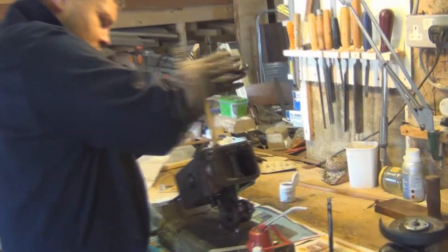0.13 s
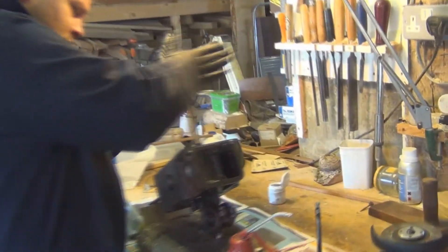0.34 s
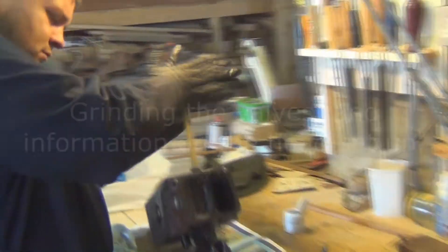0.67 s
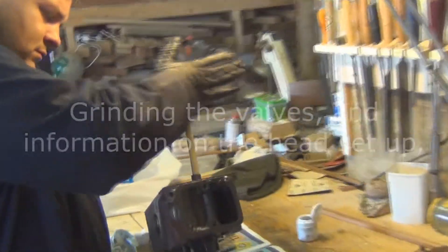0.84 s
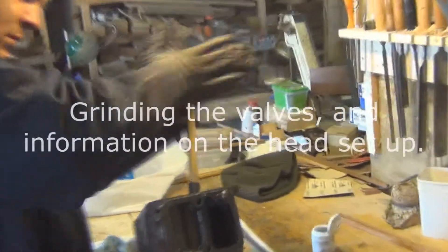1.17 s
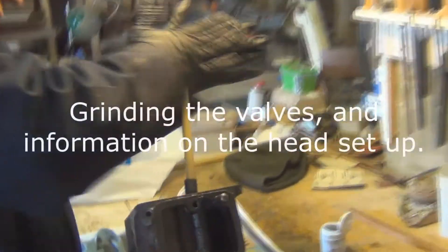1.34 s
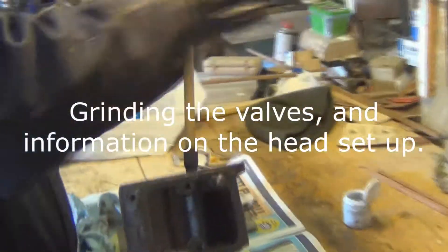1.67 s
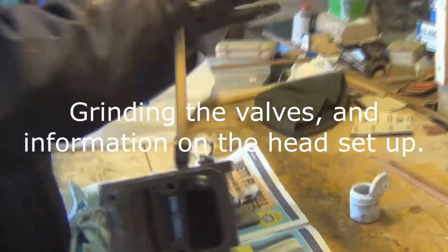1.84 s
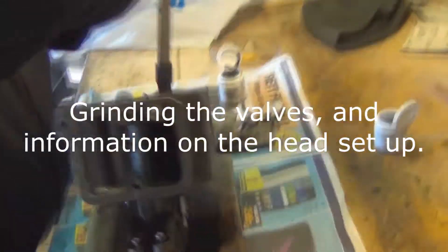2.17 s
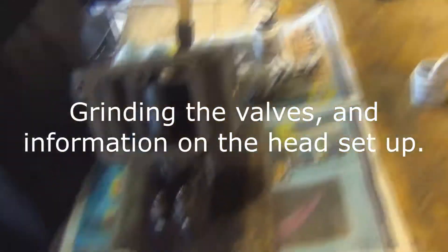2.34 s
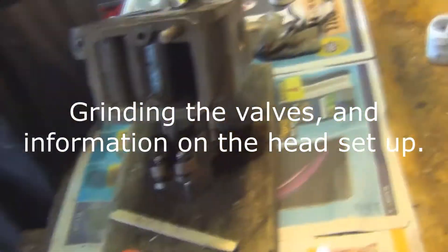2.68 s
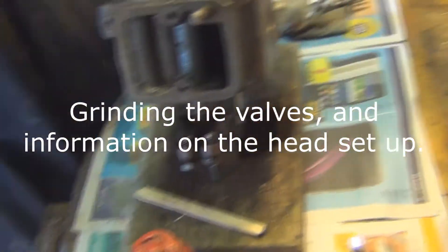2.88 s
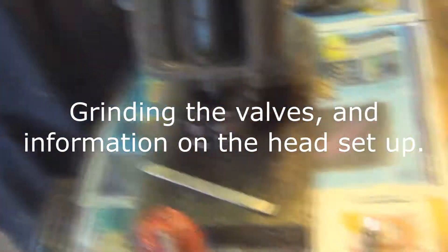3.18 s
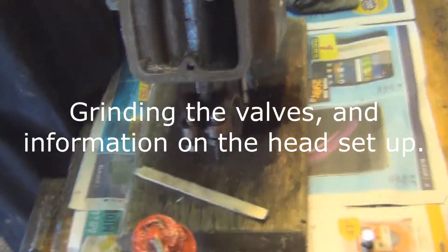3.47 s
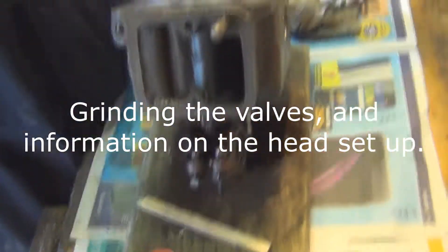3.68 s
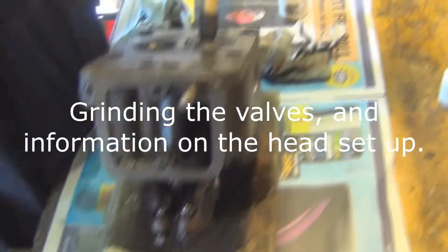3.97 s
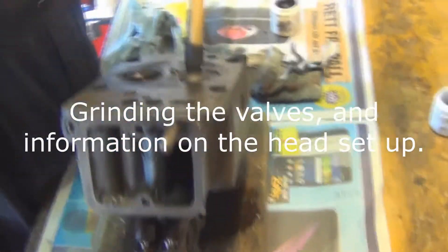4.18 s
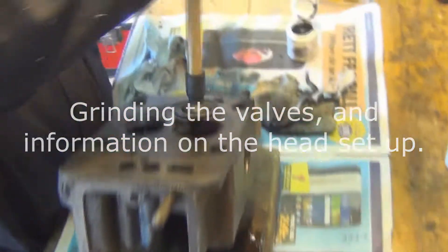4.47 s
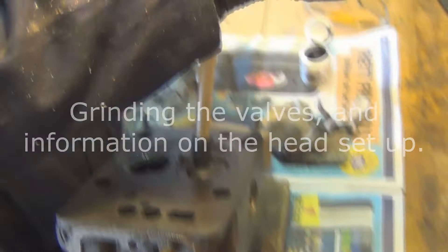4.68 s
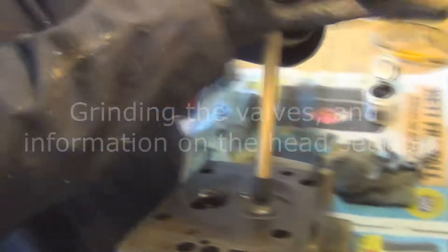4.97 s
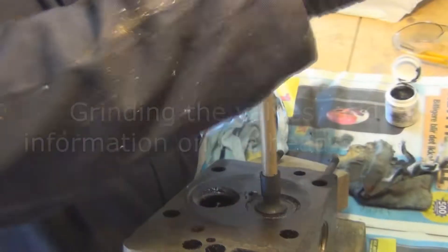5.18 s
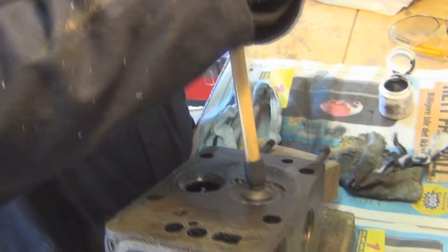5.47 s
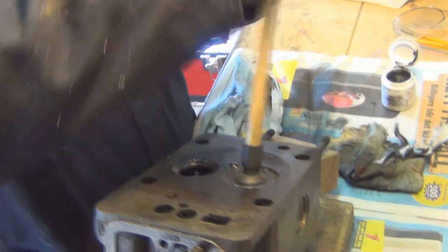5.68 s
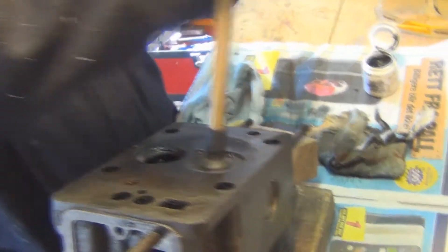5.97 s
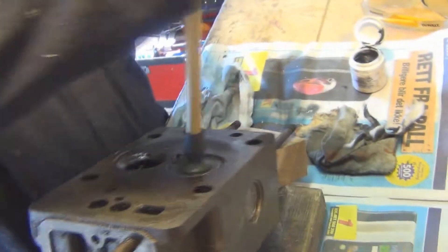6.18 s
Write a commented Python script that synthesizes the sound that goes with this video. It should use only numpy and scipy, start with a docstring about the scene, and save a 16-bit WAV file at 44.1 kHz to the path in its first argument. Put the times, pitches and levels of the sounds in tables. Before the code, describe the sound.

Rapid dry rasps, hissy and slightly singing, alternate as a stick rolled between gloved palms twists a valve on its seat. Small hollow pops and crackling grit join in, growing firmer, with a short rough iron shudder midway. A pause brings a bright steel clink, a hard scrape and a hollow knock, then weak rubs and a final flurry. Close microphone, short room reflections, low rumble and faint hum.

```python
"""A valve is lapped by hand in a small workshop, over still air, dull handling rumble, a faint hum and a thin whine.
From the start a wooden stick rolled between gloved palms rasps to and fro, eight or nine strokes a second: grit noise.
Soon the valve drops on its seat again and again, ringing the air in the port (decaying sines), and grains snap (noise puffs).
Nearly halfway, the iron head judders once on the bench: uneven jerks through its resonances. Later, in a pause, the valve
knocks down with a steel clink, bounces, grinds hard and knocks once more; a few last strokes follow."""
import sys
import numpy as np
from scipy import signal
from scipy.fft import rfft, irfft
from scipy.io import wavfile

SR = 44100
rng = np.random.default_rng(int(sys.argv[2]) if len(sys.argv) > 2 else 0)


def persist_wave(psi):
    """Save psi, clipped to +-1, as 16-bit WAV."""
    counts = np.round(np.clip(psi, -1, 1) * 32767).astype(np.int16)
    wavfile.write(sys.argv[1], SR, np.atleast_2d(counts).T)


N = 279153
TIME = np.arange(N) / SR
FIRM_DB = -38  # reference level of an ordinary firm stroke, ahead of the tone shaping


def gain_of(db):
    """Decibels to a factor."""
    return 10 ** (np.asarray(db) / 20)


def unit_rms(x):
    """Scales to rms 1."""
    return x / np.sqrt(np.mean(x ** 2) + 1e-20)


def read(points, hz):
    """Reads a table of (f/Hz, value) on a log-frequency axis."""
    f, value = np.transpose(points)
    return np.interp(np.log(hz + 1), np.log(f + 1), value)


def level(curve):
    """A table of (t/s, level/dB) as a gain for every sample."""
    return gain_of(np.interp(TIME, *np.transpose(curve)))


def add(mix, s, sound):
    """Lays a sound into the mix at s seconds."""
    part = mix[round(s * SR):][:len(sound)]
    part += sound[:len(part)]


def cut(x, hz, kind, order=2):
    """Butterworth low-pass or high-pass."""
    return signal.sosfilt(signal.butter(order, hz, kind, fs=SR, output="sos"), x)


def colour(x, points, size=4096):
    """Minimum-phase filter with the given spectrum that keeps the power of white noise."""
    log_gain = np.log(gain_of(read(points, abs(np.fft.fftfreq(size, 1 / SR)))))
    taps = np.fft.ifft(np.exp(np.conj(signal.hilbert(log_gain)))).real
    taps = taps[:size // 2]
    return signal.oaconvolve(x, taps / np.linalg.norm(taps))[:len(x)]


def resonate(x, hz, width):
    """One resonance, width in Hz, with a gain of about 1 at its peak."""
    r = np.exp(-np.pi * width / SR)
    return 2 * signal.lfilter([1 - r], [1, -r * np.exp(2j * np.pi * hz / SR)], x).real


def wander(seconds):
    """Smooth random drift of rms 1 that changes within the given time."""
    window = np.hanning(max(3, int(2 * seconds * SR)))
    return unit_rms(signal.oaconvolve(rng.standard_normal(N), window, "same"))


def grit(per_s, spread_db, smooth):
    """Tiny fractures of uneven size over a smooth hiss."""
    size = gain_of(spread_db * np.minimum(rng.exponential(1, N), 4))
    size = size * rng.choice([-1, 1], N)
    fractures = unit_rms(size * (rng.random(N) < per_s / SR))
    return unit_rms(fractures + smooth * rng.standard_normal(N))


def swipe(start, stop, db, rise, fall, sag_db_per_s=0):
    """A slide swells, sags slowly and dies away; db is its level halfway, before the soft ends."""
    past_middle = np.clip(TIME, start, stop) - (start + stop) / 2
    swell = 1 + np.tanh((TIME - start) / rise)
    decline = 1 - np.tanh((TIME - stop) / fall)
    return gain_of(db - sag_db_per_s * past_middle) * swell * decline / 4


def ring(modes, hold_s=0):
    """Sines from (f/Hz, level/dB, t60/s), dying away after a blow or after a push that lasts hold_s."""
    t = TIME[:SR // 2]
    fading = np.maximum(t - hold_s, 0)
    return sum(gain_of(db - 60 * fading / t60) * np.sin(2 * np.pi * hz * t) for hz, db, t60 in modes)


def burst(t60):
    """A short puff of noise with a sharp front."""
    t = TIME[:SR // 4]
    return rng.standard_normal(len(t)) * gain_of(-60 * t / t60)


def workshop(x):
    """A few near reflections and a short tail, each band dying at its own speed."""
    # tail by band: f/Hz, t60/s
    tail_times = [(100, 0.35), (700, 0.27), (2000, 0.26), (8000, 0.083), (16000, 0.2)]
    # reflections from the bench: delay/s, level/dB
    bench_echoes = [(.0054, -24.5), (.0081, -22.5), (.0122, -36)]
    # reflections from the walls: delay/s, level/dB
    wall_echoes = [(.056, -39), (.0655, -29)]
    sparse = rng.random(SR // 2) < 3000 / SR
    taps = rng.choice([-1., 1.], SR // 2) * sparse * (TIME[:SR // 2] > .012)
    hz, t, z = signal.stft(taps, SR, nperseg=256)
    decay = gain_of(-60 * t / read(tail_times, hz)[:, None])
    tail = signal.istft(z * decay, SR, nperseg=256)[1]
    near, far = np.zeros((2, len(tail)))
    for s, db in bench_echoes:
        add(near, s, gain_of([db]))
    for s, db in wall_echoes:
        add(far, s, gain_of([db]))
    # clutter scatters the treble, so only the lows come back as clean echoes
    early = cut(near, 3000, "low", order=1) + cut(far, 630, "low", order=6)
    reverb = early + gain_of(-14.5) * tail / np.linalg.norm(tail)
    return x + signal.fftconvolve(x, reverb)[:N]


def background(shake):
    """Dull handling rumble and still air are coloured noise; a faint electrical hum and a thin whine are sines."""
    # dull handling rumble: f/Hz, relative density/dB per Hz
    rumble_colour = [(30, -20), (70, -11), (96, -0.5), (130, -7.5), (215, -4.5), (300, -6.5), (450, -8.5),
                     (650, -15.5), (1500, -8), (5000, -104)]
    # still room: f/Hz, relative density/dB per Hz
    air_colour = [(30, -2), (90, 10), (200, -6), (400, -1.5), (750, 9.5), (1200, 2.5), (3000, -8.5),
                  (7000, -3), (10000, -15.5), (16000, -12.5)]
    hum_hz, hum_rms_db = 294.2, -73.5
    whine_hz, whine_rms_db = 15625, -89
    lumps = gain_of(3.5 * wander(seconds=.02))
    rumble = gain_of(-3.5) * shake * colour(rng.standard_normal(N) * lumps, rumble_colour)
    air = gain_of(-63.5) * colour(rng.standard_normal(N), air_colour)
    hum = gain_of(hum_rms_db) * np.sin(2 * np.pi * hum_hz * TIME)
    whine = gain_of(whine_rms_db) * np.sin(2 * np.pi * whine_hz * TIME)
    return rumble + air + np.sqrt(2) * (hum + whine)


def shaking(scraping):
    """Strength of the rumble: slow handling, and the bench shaken a moment after hard grinding."""
    # handling, ahead of the rumble's own trims: t/s, level/dB
    handling = [(0, -66), (1.2, -63), (1.8, -59.5), (2.3, -61), (2.9, -57.5), (3.4, -63.5), (3.9, -74),
                (4.3, -65), (4.85, -59), (5.25, -71), (6.3, -78)]
    lag_s, grind_db = 0.019, -14.5  # level against the scrape
    late_scrape = np.interp(TIME - lag_s, TIME, scraping)
    return np.hypot(level(handling), gain_of(grind_db) * late_scrape)


def boom(scraping):
    """The bench top swells under a hard grind and rings on: a sine drives a resonance of the same pitch."""
    hz, width_hz, against_scrape_db = 96.4, 9, -22
    tone = np.sqrt(2) * np.sin(2 * np.pi * hz * TIME)
    return resonate(gain_of(against_scrape_db) * scraping * tone, hz, width_hz)


def judder():
    """The iron head slips in quick uneven jerks; its low resonances die last."""
    # resonances of the iron head: f/Hz, width/Hz, relative level/dB
    head_modes = [(148, 49, -9.5), (222, 47, -6), (296, 32, 7), (364, 110, -6.5), (622.4, 28, 5.5),
                  (790, 140, -13), (1038, 8.3, 10.5), (1130, 31, -7), (1147, 100, -1), (1567, 47, 4),
                  (1930, 200, -8), (2590, 120, -3)]
    slips = grit(per_s=390, spread_db=4.0, smooth=0.73)
    body = sum(gain_of(db) * resonate(slips, hz, width) for hz, width, db in head_modes)
    body = unit_rms(cut(cut(body, 90, "high"), 2370, "low"))
    low = cut(body, 400, "low")
    settled = np.clip((TIME - 2.56) / 0.085, 0, 1)  # the jerks soften as the head comes to rest
    slipping = swipe(start=2.441, stop=2.685, db=-37, rise=0.0022, fall=.018)
    return slipping * (body * (1 - 0.83 * settled) + 0.73 * settled * low)


def crack(hz, t60):
    """One grain breaking: a short broad crack around hz, with little above 9.7 kHz."""
    shape = [(hz / 8, -20), (hz / 2, -5), (hz, 0), (hz * 1.15, -4), (hz * 3, -24), (hz * 9, -45)]
    return cut(colour(burst(t60), shape), 9700, "low")


def snaps(speed):
    """A few large grains snap loudly; smaller ones break at random, as hard as the valve slides."""
    # the largest grains: t/s, level/dB ahead of the top cut, centre f/Hz, t60/s
    large_grains = [(.58, -24.5, 7200, .013), (.581, -37, 2020, .05), (.6413, -45, 930, .04),
                    (1.191, -27.5, 3570, 0.018), (1.32, -37, 7300, 0.016), (1.446, -29, 4440, 0.014),
                    (1.563, -25.5, 4330, 0.021), (1.583, -27.5, 4970, 0.017), (1.7413, -37.5, 2340, 0.062),
                    (1.793, -30, 6000, 0.012), (1.8397, -25, 4960, 0.011), (1.8734, -33.5, 2170, 0.041),
                    (1.878, -37.5, 440, .02), (2.099, -29.5, 4300, 0.022), (2.2388, -30.5, 1670, 0.011),
                    (2.741, -37.5, 1400, 0.025), (2.814, -38, 6500, 0.027), (2.937, -34.5, 2330, 0.011),
                    (2.959, -29, 6000, .015), (3.105, -37, 1500, .028), (3.183, -43, 5570, 0.012),
                    (3.3097, -23.5, 4130, 0.011), (3.3108, -25.5, 1150, .015), (3.399, -29, 3550, 0.013),
                    (3.608, -39.5, 780, .02), (3.893, -33, 6040, .025), (5.29, -48, 6460, 0.017),
                    (5.568, -44, 6700, 0.021), (5.83, -37, 6300, 0.014), (6.129, -30.5, 5140, .015)]
    crumbs_per_s, crumb_db = 9, 4.5  # highest level against the stroke
    out = np.zeros(N)
    for s, db, hz, t60 in large_grains:
        add(out, s, gain_of(db) * crack(hz, t60))
    breaks = (rng.random(N) < crumbs_per_s / SR) * rng.uniform(0.27, 1, N) * speed
    crumbs = signal.oaconvolve(breaks, crack(hz=4000, t60=0.021))[:N]
    return out + gain_of(FIRM_DB + crumb_db) * crumbs


def knocks():
    """The closing valve pushes the air in the port, ticks, rings and shakes the bench."""
    # valve hits its seat, levels ahead of the trims below: t/s, port ring/dB, tick/dB, steel ring/dB
    hits = [(0.465, -12.5, -18, -54), (0.6806, -20.5, -31.5, -56), (.9219, -35, -43, -53),
            (1.1838, -22.5, -32.5, -57), (1.411, -39, -52, -53), (1.9132, -15.5, -34, -55),
            (2.3636, -16, -32, -44), (2.588, -27, -45, -55), (2.8485, -31.5, -33, -54),
            (3.026, -23, -28, -48), (3.3, -19, -29, -43), (3.529, -21, -33, -42),
            (4.7378, -19, -19.5, -27.5), (4.7486, -17.5, -44, -38), (4.9878, -12, -23.5, -57)]
    # air in the port: f/Hz, relative level/dB, t60/s
    port_modes = [(737.3, 1.5, 0.05)]
    # steel valve: f/Hz, relative level/dB, t60/s
    steel_modes = [(1670, -35, .3), (2655, -22, .3), (3100, -29, 0.33), (6340, -10, 0.16),
                   (6950, -6.5, 0.14), (7310, -5, .08), (7510, 4.5, 0.097), (7940, -5, .16),
                   (8240, -7, 0.12), (8240, -17, 0.28), (9840, -33, .25), (12600, -22, 0.12)]
    # bench top: f/Hz, relative level/dB, t60/s
    bench_modes = [(93, 8, 0.15), (153, -9, 0.23), (215, 6, 0.22), (430.3, 3.5, 0.22)]
    # tick of the seat: f/Hz, relative density/dB per Hz
    tick_colour = [(100, -13), (400, -25.5), (1100, -5), (1450, -4.5), (1780, 1.5), (2100, -6), (2600, -11),
                   (4000, -16.5), (8000, -26), (16000, -34)]
    rings, ticks, thuds = np.zeros((3, N))
    port = ring(port_modes, hold_s=0.0074)  # the closing valve keeps pushing the air this long
    steel, bench = ring(steel_modes), ring(bench_modes)
    bench = bench * (1 - np.exp(-TIME[:len(bench)] / 0.0057))  # the heavy head passes the blow on slowly
    for s, port_db, tick_db, steel_db in hits:
        add(rings, s, gain_of(port_db - 5.0) * port + gain_of(steel_db) * steel)
        add(ticks, s, gain_of([tick_db + 10.5]))  # the contact itself
        add(ticks, s, gain_of(tick_db - 9.5) * burst(t60=0.028))  # crushed paste
        add(thuds, s, gain_of(port_db - 38.5) * bench)
    # the small port radiates almost no bass
    return cut(rings, 685, "high") + colour(ticks, tick_colour) + thuds


def grinding():
    """Strength of the scrape and of the port's hum while the valve is ground hard: a quick bite that eases off."""
    # hard grinds: start t/s, stop t/s, scrape level/dB, port hum level/dB
    grinds = [(4.43, 4.512, -56, -60), (4.751, 4.789, -33.5, -31.5), (4.798, 4.828, -43.5, -34),
              (5.405, 5.515, -48.5, -44)]
    scrape, hum = np.zeros((2, N))
    for start, stop, scrape_db, hum_db in grinds:
        # the paste thins out while the valve slides, hence the sag
        press = swipe(start, stop, 0, rise=0.0028, fall=0.43 * (stop - start), sag_db_per_s=56)
        scrape = scrape + gain_of(scrape_db) * press
        hum = hum + gain_of(hum_db) * press
    return scrape, hum


def seat(speed, scraping, humming):
    """Paste ground under the valve's rim scrapes, and the port hums along with every stroke and grind."""
    # scrape on the seat: f/Hz, relative density/dB per Hz
    scrape_colour = [(200, -21), (600, -6), (1200, -3.5), (1750, 4.5), (2300, -3), (3200, -5.5),
                     (5000, -14), (7500, 2.5), (9000, -18), (16000, -54)]
    hollow_db, growth, lag_s = -59.5, 0.96, 0.023  # hum in a firm stroke; it swells a little late
    scrape = colour(scraping * grit(per_s=1100, spread_db=2.5, smooth=0.92), scrape_colour)
    turns = np.cumsum(738 + 16 * wander(seconds=0.00646)) / SR
    flutter = gain_of(3 * wander(seconds=.009))
    hum = np.sqrt(2) * np.sin(2 * np.pi * turns) * flutter
    late_speed = np.interp(TIME - lag_s, TIME, speed)
    return scrape + (humming + gain_of(hollow_db) * late_speed ** growth) * hum


def sliding():
    """Sliding speed of the valve, 1 in a firm stroke: every twist speeds up and slows down alike."""
    # twists of the stick, to or fro: start t/s, stop t/s, level/dB on the scale of FIRM_DB
    strokes = [(0, 0.075, -46), (0.128, 0.205, -48.5), (0.22, 0.288, -45.5), (0.354, 0.391, -43),
               (0.456, 0.519, -41.5), (0.574, 0.615, -37.5), (0.688, 0.788, -45), (0.82, 0.877, -42),
               (0.938, 1.038, -43.5), (1.071, 1.118, -40), (1.19, 1.254, -38), (1.309, 1.355, -39),
               (1.416, 1.509, -40), (1.539, 1.611, -39.5), (1.644, 1.781, -42), (1.799, 1.85, -36.5),
               (1.908, 1.973, -35.5), (2.017, 2.081, -37), (2.123, 2.212, -39), (2.253, 2.308, -35.5),
               (2.369, 2.442, -35.5), (2.485, 2.56, -38), (2.593, 2.682, -38), (2.719, 2.77, -38.5),
               (2.82, 2.887, -36.5), (2.954, 2.979, -31), (3.037, 3.142, -43.5), (3.181, 3.224, -36),
               (3.293, 3.374, -38), (3.409, 3.46, -34), (3.518, 3.565, -33.5), (3.637, 3.72, -40),
               (3.732, 3.841, -42), (3.887, 3.949, -38), (3.984, 4.112, -41), (4.132, 4.191, -36.5),
               (4.222, 4.32, -39), (4.366, 4.429, -37.5), (4.891, 4.966, -43), (5.28, 5.32, -50.5),
               (5.358, 5.455, -51), (5.815, 5.835, -46), (5.9, 5.994, -42.5), (6.062, 6.135, -35.5),
               (6.186, 6.26, -39.5), (6.31, 6.355, -37.5)]
    power = np.zeros(N)
    for start, stop, db in strokes:
        # the paste thins out while the valve slides, hence the sag
        power += swipe(start, stop, db, rise=0.013, fall=0.031, sag_db_per_s=12) ** 2
    return np.sqrt(power) / gain_of(FIRM_DB)


def rasp(speed):
    """Each stroke drags grit across the contact; the grip flutters, the valve sings, the port colours coarse grit."""
    # light rubbing between the strokes, ahead of the tone shaping: t/s, level/dB
    rubbing = [(0, -62), (4.4, -56.5), (4.7, -63), (5.0, -57.5), (5.2, -72.5), (5.55, -61.5), (5.7, -68)]
    # fine part of the rasp: f/Hz, relative density/dB per Hz
    fine_colour = [(300, -28), (1400, -30.5), (2500, -10.5), (3500, -8), (4300, -5.5), (5400, -4.5),
                   (6300, -.5), (7400, 3), (8250, -0.5), (8700, -6), (9500, -6), (10000, -10.5),
                   (12000, -20), (16000, -28.5)]
    # coarse part of the rasp: f/Hz, relative density/dB per Hz
    coarse_colour = [(100, -3.5), (230, -2.5), (550, -2.5), (1130, -1), (1480, -4), (1740, 5), (2100, 5),
                     (2650, -0.5), (3500, 0), (5000, -0.5), (9000, -6.5), (16000, -25)]
    # coarse grit grows less than the hiss, so hard strokes are brighter
    coarse_db, coarse_growth = -46, 0.82
    fine = np.hypot(gain_of(FIRM_DB) * speed, level(rubbing))
    coarse = np.hypot(gain_of(coarse_db) * speed ** coarse_growth, gain_of(-1) * level(rubbing))
    grip = gain_of(1.1 * wander(seconds=.007))
    fine = fine * grip * grit(per_s=6000, spread_db=4, smooth=1.2)
    coarse = coarse * grip * grit(per_s=2500, spread_db=2, smooth=.9)
    hiss = gain_of(-0.95) * colour(fine, fine_colour)
    singing = gain_of(6) * resonate(fine, 7310, 28)
    singing += gain_of(-2) * resonate(fine, 7510, 45)
    singing += gain_of(-4.0) * resonate(fine, 7860, 50)
    crunch = gain_of(-1.02) * colour(coarse, coarse_colour)
    hollow = gain_of(-0.5) * resonate(coarse, 1730, 100)
    hollow += gain_of(7.5) * resonate(resonate(coarse, 728, 87), 850, 160)
    return hiss + singing + crunch + hollow


def scene():
    """The work is straight ahead, the port a little to the left; scattered sound and handling rumble give some width."""
    # stereo width: f/Hz, side minus mid level/dB
    width = [(60, -8), (160, -16), (350, -15), (1400, -20), (2600, -32.5), (5000, -20.5), (7500, -12),
             (9000, -17.5), (13000, -42)]
    # balance of the whole mix by pitch: f/Hz, left minus right level/dB
    balance = [(30, 5), (85, -6), (180, -2.8), (350, 1), (740, 0.8), (1400, -0.6), (2800, -0.5), (16000, 0)]
    # handling rumble that differs between the ears: f/Hz, relative density/dB per Hz
    side_rumble_colour = [(30, 4), (60, 11), (100, -6), (200, -1), (400, -10), (1500, -53), (5000, -74)]
    speed = sliding()
    scraping, humming = grinding()
    shake = shaking(scraping)
    port = workshop(knocks() + seat(speed, scraping, humming))
    rest = workshop(rasp(speed) + snaps(speed) + judder()) + boom(scraping) + background(shake)
    hz, mid = np.fft.rfftfreq(N, 1 / SR), rfft(port + rest)
    scatter = np.exp(1j * np.angle(rfft(burst(t60=0.052), N)))  # random phases only
    side = rfft(rest + gain_of(0.5) * port) * scatter * gain_of(read(width, hz))
    side_rumble = gain_of(-12) * shake * colour(rng.standard_normal(N), side_rumble_colour)
    side = side + rfft(gain_of(-24) * port + side_rumble)  # an unscattered share pulls the port left
    lean = gain_of(read(balance, hz) / 2)
    return np.array([irfft((mid + side) * lean, N), irfft((mid - side) / lean, N)])


def record(dry):
    """The bass rolls off below 56 Hz and a steep band limit closes the top."""
    thinned = cut(dry, 56, "high")
    band_limit = signal.firwin(511, 15800, window=("kaiser", 9), fs=SR)
    return signal.oaconvolve(thinned, band_limit[None], "same")


dry = scene()
out = record(dry)
persist_wave(out)
```